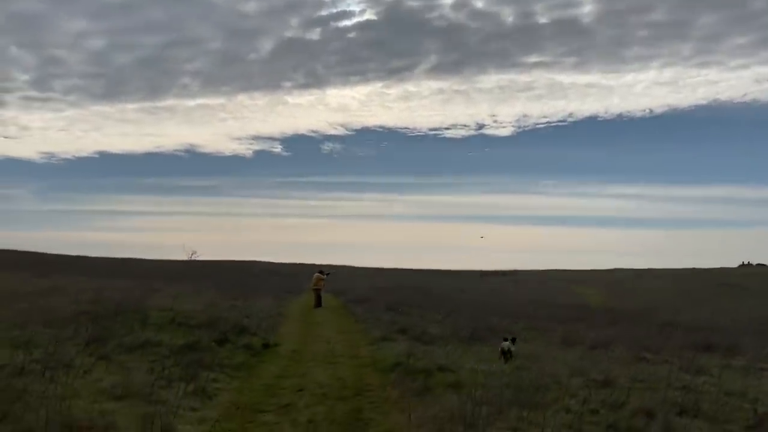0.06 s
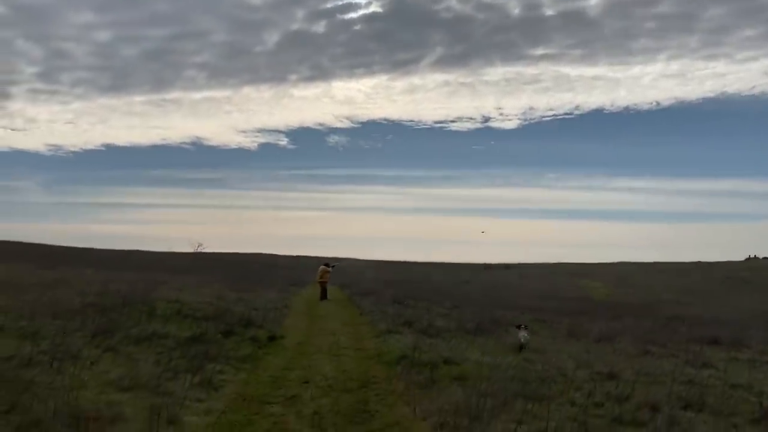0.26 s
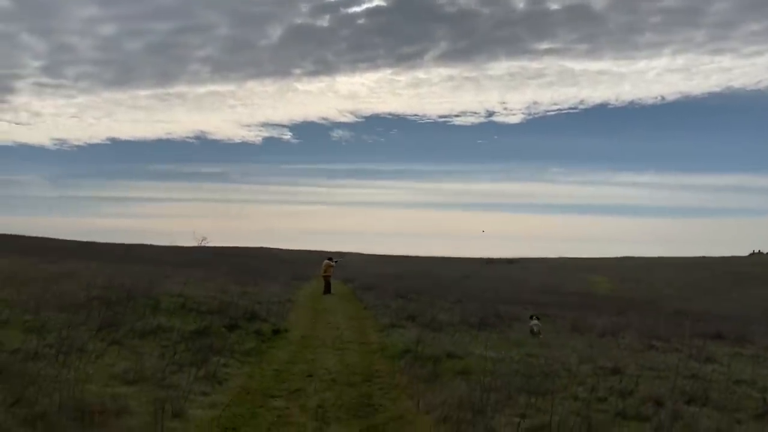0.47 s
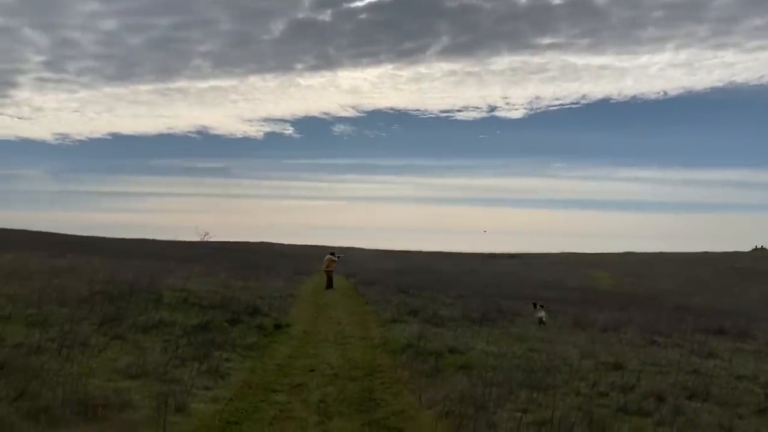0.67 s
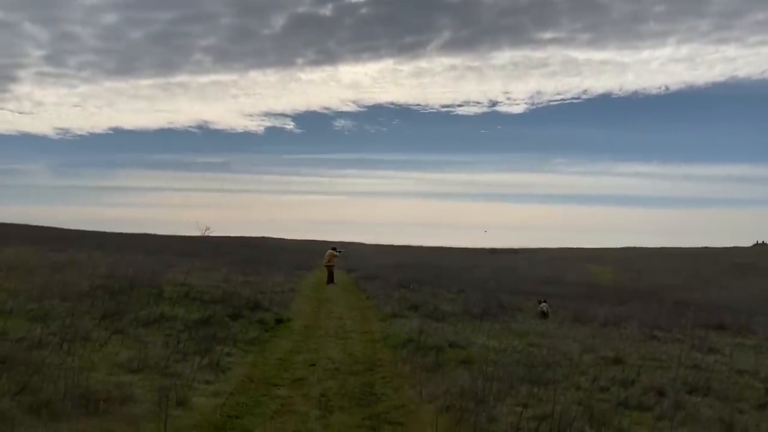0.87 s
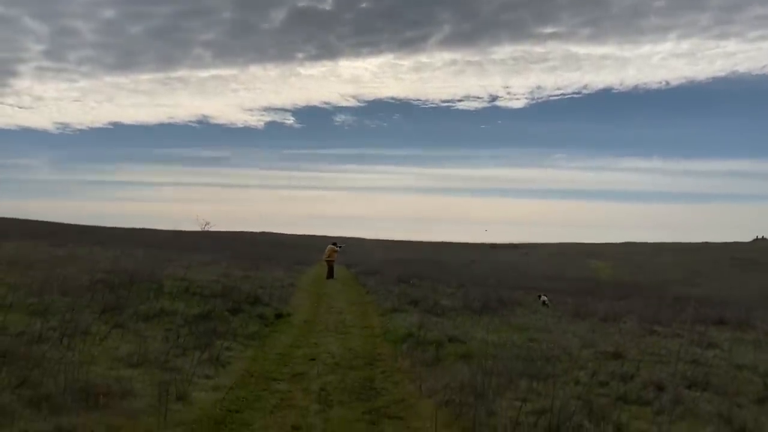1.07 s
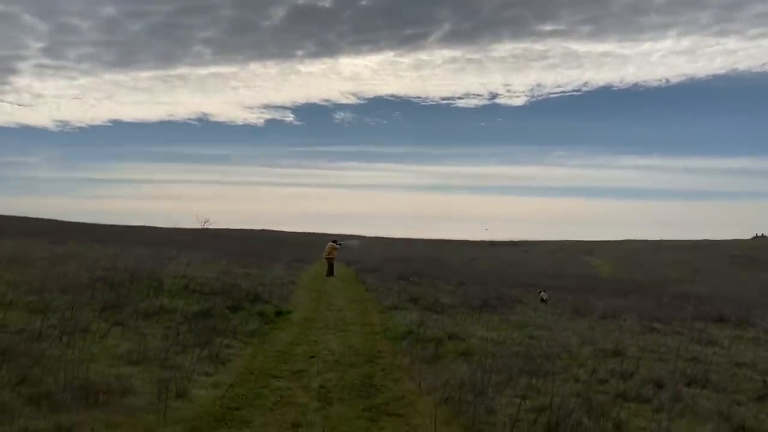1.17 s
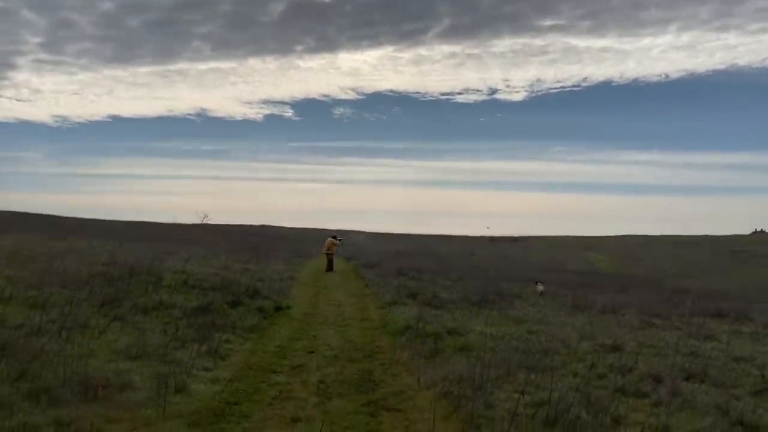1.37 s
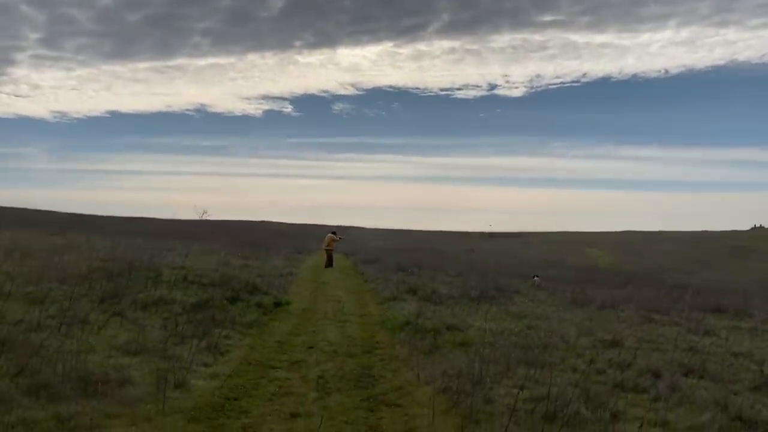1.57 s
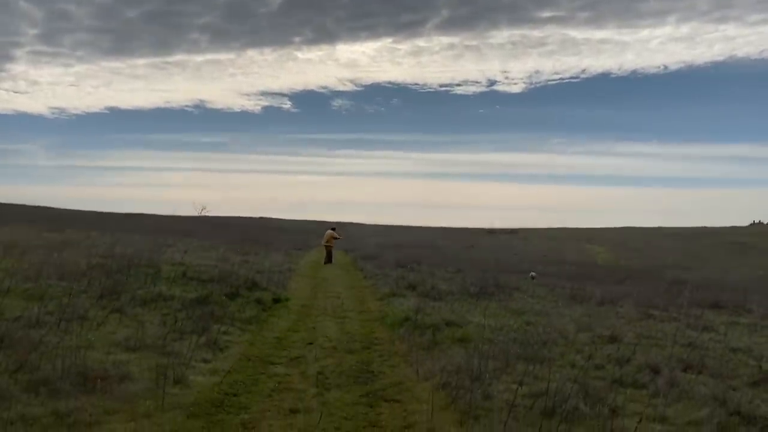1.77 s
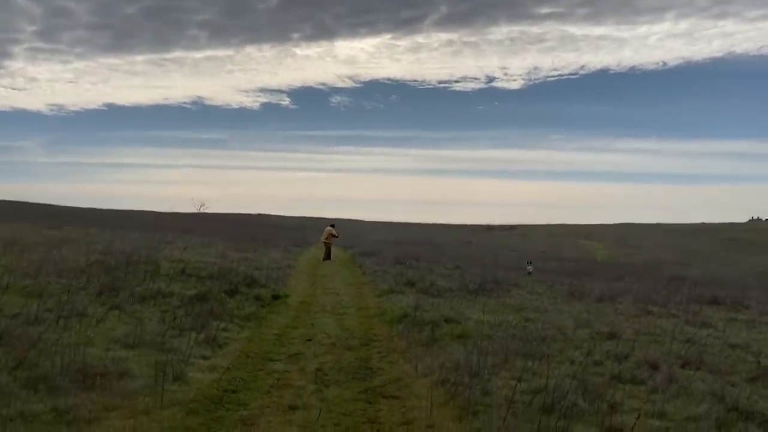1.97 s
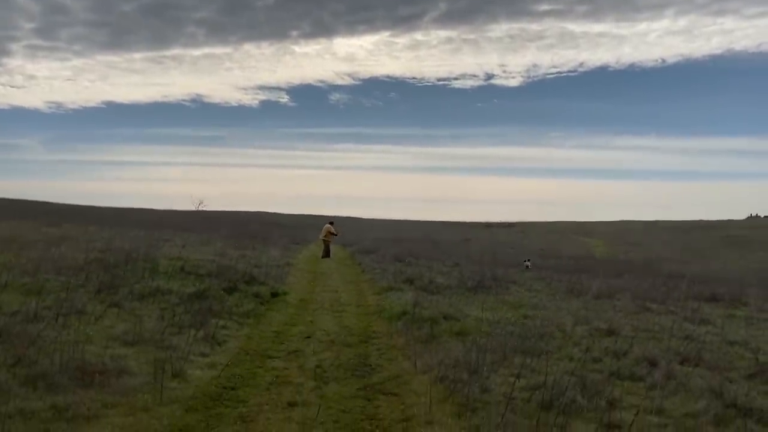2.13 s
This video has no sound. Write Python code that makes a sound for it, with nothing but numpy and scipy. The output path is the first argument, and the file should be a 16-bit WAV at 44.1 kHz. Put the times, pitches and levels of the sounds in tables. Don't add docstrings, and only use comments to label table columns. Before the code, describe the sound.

Shotgun fires twice outdoors, sharp cracks with low booms over quiet wind and dry grass

```python
import sys
import numpy as np
from scipy import signal
from scipy.fft import rfft, irfft
from scipy.io import wavfile
from scipy.ndimage import uniform_filter1d

SR = 44100
rng = np.random.default_rng(int(sys.argv[2]) if len(sys.argv) > 2 else 0)


def field_ratio(decibels):
    return 10 ** (np.asarray(decibels, dtype=float) / 20)


def store_pcm(level_fs):
    pcm = np.round(np.clip(level_fs, -1, 1) * 32767).astype(np.int16)
    wavfile.write(sys.argv[1], SR, np.atleast_2d(pcm).T)


N = 97020


def curve(rows, t):
    rows = np.array(rows, float)
    return field_ratio(np.interp(t, rows[:, 0], rows[:, 1]))


def pan(db):
    return field_ratio(np.array([[db / 2], [-db / 2]]))


def noise(colour, likeness, size=N):
    hz = np.maximum(np.fft.rfftfreq(size, 1 / SR), 1)
    rows = np.array(colour, float)
    gain = field_ratio(np.interp(np.log(hz), np.log(rows[:, 0]), rows[:, 1], left=-90, right=-90))
    mid, side = irfft(rfft(rng.standard_normal((2, size))) * gain, size)
    c = np.clip(likeness, 0, 1)
    x = np.sqrt(1 + c) * mid + np.sqrt(1 - c) * side * np.array([[1], [-1]])
    return x / np.sqrt(np.mean(x ** 2))


def walk(rate):
    k = int(SR / rate)
    steps = np.repeat(rng.standard_normal(N // k + 1), k)
    return 0.98 * uniform_filter1d(uniform_filter1d(steps, k), k)[:N]


def filtered(x, order, hz, kind):
    return signal.sosfilt(signal.butter(order, hz, kind, fs=SR, output="sos"), x)


# time in seconds, level in dB.
FIELD_LEVEL = [(0, -60), (.2, -64), (.8, -78), (1.1, -76.5), (1.9, -71), (2.2, -72)]
# frequency in Hz, density in dB per Hz.
FIELD_COLOUR = [(120, -29), (200, -2.5), (900, -15.5), (1300, -27.5), (2500, -34), (6240, -41.5),
                (9140, -49.5), (13400, -44), (15500, -57)]


def far_field(t):
    return curve(FIELD_LEVEL, t) * field_ratio(2.3 * walk(9.6)) * noise(FIELD_COLOUR, 0.2)


# time in seconds, level in dB.
GUST_LEVEL = [(0, -62), (.12, -61), (.34, -56.5), (.6, -57.5), (.75, -64.5), (1.0, -57.5), (1.16, -53),
              (1.4, -51), (1.65, -53), (1.92, -57), (2.2, -60)]
# frequency in Hz, density in dB per Hz.
WIND_COLOUR = [(20, -29.5), (35, -5.5), (70, 7), (140, -9), (220, -21.5), (350, -32), (600, -39),
               (900, -65)]
WIND_LIKENESS = .85


def wind(t):
    return curve(GUST_LEVEL, t) * field_ratio(2.5 * walk(20)) * noise(WIND_COLOUR, WIND_LIKENESS)


def burst(at, db, hz, length, pan_db=0., spread=1.25, likeness=0.49, size=8192):
    u = np.arange(size) / SR
    shape = np.clip(u / (.2 * length), 0, 1) * np.exp(-(u / length) ** 2)
    colour = [(hz / spread ** 3, -25), (hz / spread, -3), (hz, 0), (hz * spread, -3), (hz * spread ** 3, -25)]
    puff = noise(colour, likeness, size=size) * shape
    level = np.sqrt(np.sum(shape ** 2) / np.sum(puff ** 2) * 2)
    return int(at * SR), field_ratio(db) * puff * pan(pan_db) * level


def bursts(rows, **settings):
    out = np.zeros((2, N))
    for row in rows:
        k, puff = burst(*row, **settings)
        out[:, k:k + puff.shape[1]] += puff[:, :N - k]
    return out


# start in seconds, level in dB, pitch in Hz, length in seconds.
BUFFETS = [(0, -54, 69.6, 0.017), (0.146, -50, 91, 0.074), (0.408, -48, 105, 0.055),
           (0.501, -51, 87.5, 0.044), (0.597, -55.5, 74.6, 0.046), (0.789, -50.5, 86.6, 0.043),
           (0.935, -52.5, 83.4, 0.046), (1.115, -48.5, 69.5, 0.071), (1.44, -46, 102.5, 0.094),
           (1.6, -54, 63.3, 0.049), (1.705, -41.5, 79.3, 0.032), (1.748, -46.5, 65.5, 0.071),
           (2.17, -50.5, 100.3, 0.049)]


def buffets():
    return bursts(BUFFETS, spread=1.5, likeness=WIND_LIKENESS)


# start in seconds, level in dB, pitch in Hz, length in seconds.
TICKS = [(.01, -70, 7913, 0.008), (0.073, -79, 6600, 0.035), (.08, -76, 12000, 0.053),
         (.114, -71, 11000, 0.0027), (0.175, -64, 11800, 0.0023), (0.179, -79, 10100, 0.035),
         (0.754, -63.5, 11100, 0.0035), (0.79, -66, 10220, 0.0027), (0.837, -77, 9000, 0.019),
         (0.908, -74.5, 7500, 0.074), (0.935, -58.5, 5540, 0.0025), (0.949, -58, 4850, 0.002),
         (1.149, -75.5, 2500, 0.0057), (1.181, -70, 8100, 0.0033), (2.077, -75.5, 7980, 0.0024),
         (2.099, -78, 8000, 0.004)]


def grass_ticks():
    return bursts(TICKS, spread=1.45)


# start in seconds, level in dB, pitch in Hz, length in seconds, left over right in dB.
SLAPS = [(.2225, -45, 790, 0.0032, -5), (.2322, -27, 835, 0.0025, -5), (1.2325, -48.5, 1090, 0.0034, 17.5),
         (1.2325, -43, 674, .003, 12), (.035, -70.5, 1120, 0.067, 2), (.12, -75, 1250, 0.022, -6.5),
         (.55, -66.5, 1830, 0.1, 4), (.56, -59.5, 711.5, .12, -12), (.852, -75, 2050, 0.014, 7),
         (.411, -49.5, 1900, 0.0032, 2), (0.412, -54, 1236, 0.0027, 6.5), (.850, -69, 1430, 0.015, -4),
         (.852, -70.5, 2850, 0.019, -4.5), (1.412, -54, 1150, 0.0044, 7), (1.498, -65, 1174, 0.006, -8),
         (1.850, -62.5, 1622, 0.014, -4), (1.851, -62.5, 2582, 0.018, 3), (1.851, -65, 820, 0.011, -1),
         (1.852, -72.5, 1570, .003, 11), (1.853, -76, 2510, 0.0028, -4), (1.497, -66.5, 1070, .08, -1)]


def slaps():
    return bursts(SLAPS, spread=1.2)


# time after the shot in seconds, level in dB.
GRASS_DECAY = [(0, -46.5), (.04, -48.5), (.1, -51.5), (.17, -56.5), (.2, -61.5), (.29, -63), (.34, -59),
               (.42, -69), (.72, -76.5)]
# frequency in Hz, density in dB per Hz.
GRASS_COLOUR = [(600, -31.5), (1000, -1), (1800, -9.5), (4000, -2), (7500, -6), (11900, -5.5),
                (15800, -9.5), (16400, -38.5)]


def grass_scatter(u):
    air_hz, air_db_per_s = 9000, -27.5
    grass = noise(GRASS_COLOUR, 0.043)
    treble = filtered(grass, 4, air_hz, "high")
    low = filtered(grass, 4, air_hz, "low")
    treble = treble * field_ratio(air_db_per_s * np.maximum(u, 0) + 2.5 * walk(17))
    return curve(GRASS_DECAY, u) * (low * field_ratio(1.5 * walk(42)) + treble)


# time after the shot in seconds, level in dB.
SLOPE_DECAY = [(0, -46.5), (.05, -54.5), (.16, -61.5), (.28, -62), (.36, -60), (.48, -62.5), (.53, -74.5),
               (.75, -80)]
# frequency in Hz, density in dB per Hz.
SLOPE_COLOUR = [(88, -33), (150, -4.5), (287, -4), (752, 1), (1470, -17), (1720, -15), (2500, -13.5),
                (3250, -47), (5500, -120)]
# change of a shot's slope echoes past 0.28 s, in dB.
SLOPE_LATE_DB = [-0.5, -1.5]


def slope_echoes(u, which):
    late = SLOPE_LATE_DB[which] * np.clip((u - .28) / 0.013, 0, 1)
    return curve(SLOPE_DECAY, u) * noise(SLOPE_COLOUR, 0.52) * field_ratio(2.2 * walk(38) + late)


# frequency in Hz, density in dB per Hz.
RUMBLE_COLOUR = [(100, -24.5), (160, -0.5), (300, -4), (500, -7), (800, -29)]
RUMBLE_DB = [-57.5, -47.5]


def rumble(u, which):
    fade = np.exp(-np.maximum(u, 0) / .13)
    return field_ratio(RUMBLE_DB[which] + 2.5 * walk(34)) * fade * noise(RUMBLE_COLOUR, 0.3)


FORE_START_S = .026
# pitch in Hz, level in dB, rise in seconds, left over right in dB.
FORE_RINGS = [
    [(1926, -17.5, 0.017, 13), (2950, -19.5, 0.025, 17.5), (3700, -33.5, 0.07, 14.5),
     (5120, -30, 0.028, 12.5), (6850, -37.5, .06, 13), (346, -28.5, 0.028, 10.5), (1500, -26, .03, 6),
     (205, -30, .08, 9)],
    [(3440, -23.5, 0.025, 0), (1900, -35, 0.022, 2.5), (4980, -42, .03, 9.5), (240, -41, .06, -1),
     (6300, -37.5, 0.027, 1), (7500, -43.5, 0.033, 9.5), (1169, -38, 0.035, -3)],
]


def fore_rings(t, which):
    out, u = 0, t + .0018
    fade_in = np.clip((t + FORE_START_S) / .005, 0, 1)
    for hz, db, rise, pan_db in FORE_RINGS[which]:
        wander = 1.6 * np.array([walk(400)[:len(t)] for _ in range(2)])
        flutter = field_ratio(2.5 * walk(500)[:len(t)])
        band = np.sqrt(2) * np.sin(2 * np.pi * hz * t + wander) * flutter
        gain = field_ratio(db + 60 * np.minimum(u, 0) / rise - 5000 * np.maximum(u, 0)) * fade_in
        out = out + gain * band * pan(pan_db)
    return out


# left over right in dB, left lag in radians.
BOOM_LEAN = [
    (2, 0.17),
    (0.5, .02),
]


def boom(t, swell, which):
    offset_s, stretch, peak_s = .0042, 1.77, .0038
    pan_db, lag = BOOM_LEAN[which]
    u = np.maximum(t, 0)
    turns = np.log((u + offset_s) / (peak_s + offset_s)) / np.log(stretch)
    shape = np.exp(-np.maximum(u - .0056, 0) / .0032) + field_ratio(-12.5) * np.exp(-u / .022)
    phase = 2 * np.pi * turns + lag * np.array([[-1], [1]])
    return np.cos(phase) * shape * np.clip(t / swell, 0, 1) * pan(pan_db)


def thud(t):
    return field_ratio(-36) * np.exp(-((t - 0.066) / .0012) ** 2)


# frequency in Hz, density in dB per Hz.
CRACK_COLOUR = [(500, -25), (1100, -1), (2200, -1), (3200, -1), (6500, -6), (8800, -18), (13000, -20.5),
                (16300, -29.5)]


def crack(t, db, hold):
    after, early = np.maximum(t - hold, 0), np.minimum(t, 0)
    fill = field_ratio(-20.5) * np.exp(early / 0.002) * (t > -FORE_START_S)
    lead = np.exp(early / .0012) + fill
    fall = np.exp(-after / .0011) + field_ratio(-15) * np.exp(-after / .005)
    return field_ratio(db) * noise(CRACK_COLOUR, .65, size=len(t)) * lead * fall


N_WAVE_S = .00068


def n_wave(t):
    def edge(u):
        return .5 + .5 * np.tanh(u / .00004)
    return (1 - 2 * t / N_WAVE_S) * edge(t) * edge(N_WAVE_S - t)


N_WAVE_DB, RECOIL_DB = [-2.5, -3], [-5, -1]
# lag in seconds, level in dB.
BOUNCE = [
    (.0035, -9),
    (0.0025, -1),
]


def muzzle_blast(t, which):
    recoil_s = 0.00033
    lag, bounce_db = BOUNCE[which]
    recoil = field_ratio(RECOIL_DB[which]) * np.exp(-((t - N_WAVE_S) / recoil_s - 1) ** 4)
    direct = field_ratio(N_WAVE_DB[which]) * (n_wave(t) + recoil)
    return direct + field_ratio(N_WAVE_DB[which] + bounce_db) * n_wave(t - lag)


SHOT_S = [.2442, 1.2448]
# boom level in dB, crack level in dB, crack hold in seconds, tail level in dB, boom swell in seconds.
SHOTS = [
    (-12, -13.5, 0.00033, 0.5, 0.0034),
    (-15, -17, 0.0041, -1, 0.0084),
]


def shot(t, which):
    boom_db, crack_db, hold, tail_db, swell = SHOTS[which]
    at = SHOT_S[which]
    start, size = int(at * SR) - 2048, 8192
    u = t - at
    near = u[start:start + size]
    gone = (u > 0) * field_ratio(-150 * np.maximum(u - .74, 0))
    tail = grass_scatter(u) + slope_echoes(u, which) + rumble(u, which)
    out = field_ratio(tail_db) * gone * tail
    direct = filtered(muzzle_blast(near, which) + crack(near, crack_db, hold), 2, 170, "high")
    ground = field_ratio(boom_db) * boom(near, swell, which) + thud(near)
    out[:, start:start + size] += ground + direct + fore_rings(near, which)
    return out


def scene():
    t = np.arange(N) / SR
    out = far_field(t) + wind(t) + buffets() + grass_ticks() + slaps()
    for which in range(len(SHOTS)):
        out = out + shot(t, which)
    return out


def roll_off(x):
    return signal.sosfilt(signal.butter(12, 16380, fs=SR, output="sos"), x)


def record(dry):
    dry = filtered(dry, 2, 38, "high")
    hz = np.fft.rfftfreq(N, 1 / SR)

    def without_band(x, low, high):
        inside = np.clip(np.minimum(hz - low, high - hz) / 200 + .5, 0, 1)
        return irfft(rfft(x) * field_ratio(-36 * inside), N)

    loud = np.clip(uniform_filter1d(np.abs(dry[0]), size=300) / field_ratio(-14), 0, 1) ** 4
    mid, side = (dry[0] + dry[1]) / 2, (dry[0] - dry[1]) / 2
    mid = irfft(rfft(mid) * field_ratio(-.03 * np.maximum(hz - 14246, 0)), N)
    leak = 0.44 * loud
    mid = mid * leak + without_band(mid, 8400, 10100) * (1 - leak)
    side = side * loud + without_band(side, 10700, 13500) * (1 - loud)
    return roll_off(np.array([mid + side, mid - side]))


dry = scene()
out = record(dry)
store_pcm(out)
```